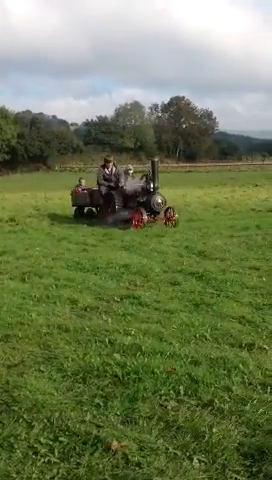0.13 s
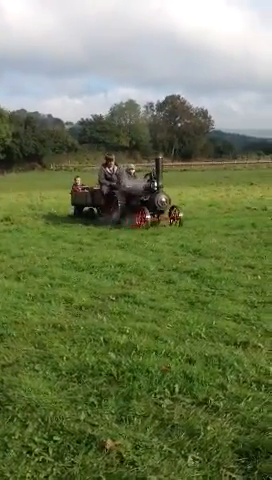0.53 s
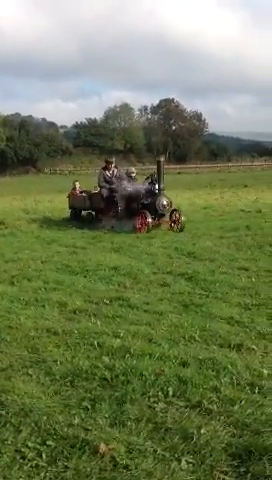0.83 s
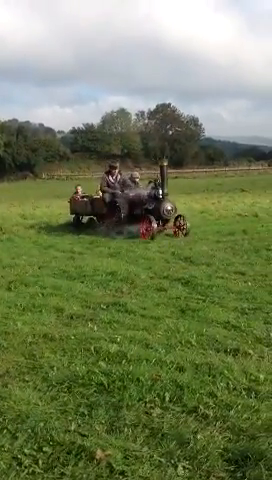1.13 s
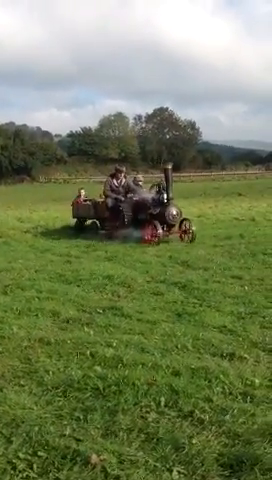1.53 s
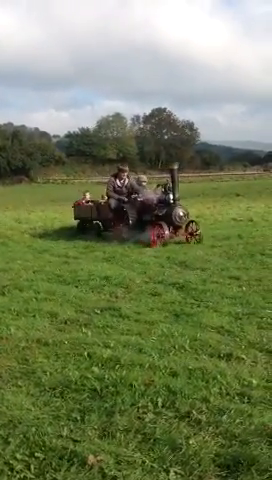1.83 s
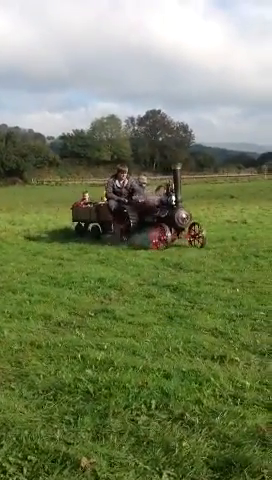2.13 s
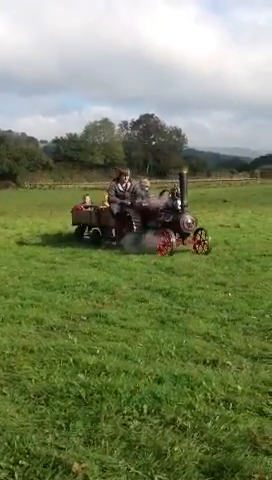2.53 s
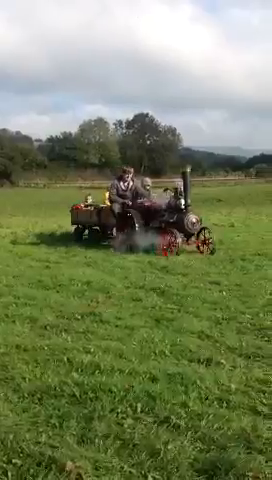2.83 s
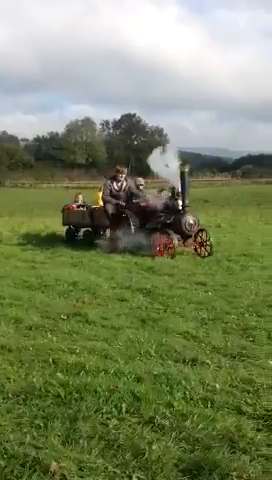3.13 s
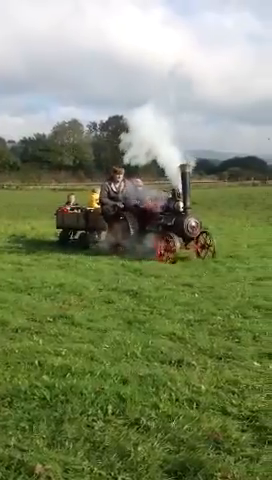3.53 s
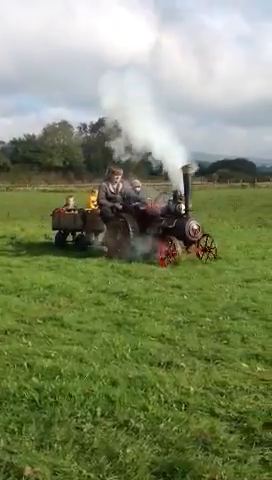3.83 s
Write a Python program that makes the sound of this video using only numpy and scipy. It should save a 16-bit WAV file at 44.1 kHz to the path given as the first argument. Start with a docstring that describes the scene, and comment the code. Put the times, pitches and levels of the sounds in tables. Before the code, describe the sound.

Brisk, even exhaust chuffs from a miniature steam engine, ending in a loud overblown steam whistle

```python
"""A miniature steam traction engine crosses a field: wheels rumble, ironwork rings and steam leaks, all shaped noise.
Over this the exhaust barks up the chimney about seven times a second, each beat a blast, an exhale and a low push.
The whistle gives a thin high chirp, a gliding sine; later it sounds low, as a stack of partials.
Then it rises and overblows in a loud hiss as its valve opens, and the recorder's gain control ducks the mix."""
import sys
import numpy as np
from scipy import signal
from scipy.fft import rfft, irfft, next_fast_len
from scipy.io import wavfile
from scipy.ndimage import uniform_filter1d, map_coordinates

SR = 44100
rng = np.random.default_rng(int(sys.argv[2]) if len(sys.argv) > 2 else 0)


def materialize(psi):
    """Save the field psi as 16-bit PCM at rate SR to the path in sys.argv[1].

    A 1-D psi becomes a single channel; in a 2-D psi each row is a channel.
    """
    bounded = np.clip(np.atleast_2d(psi).T, -1, 1)
    quanta = np.round(bounded * 32767).astype(np.int16)
    wavfile.write(sys.argv[1], SR, quanta)


N = 176400  # samples, four seconds

# All levels are set ahead of the gain control; colours are relative, their noise is scaled to rms 1.
# Colour of gears and wheels: (frequency [Hz], density [dB per Hz])
RUMBLE_COLOUR = [(30, -45), (60, -25), (100, -20.5), (150, -2), (220, -6.5), (320, -3.5), (410, -7.5),
                 (520, -11), (700, -30), (1200, -80)]
# Ringing gearing and ironwork: (frequency [Hz], width [Hz], level [dB])
IRON_RINGS = [(232.2, 7.1, -41.5), (308, 12, -48), (456, 37, -54.5), (928, 74, -48.5), (1410, 210, -48),
              (2410, 110, -46)]
# Colour of the steam leak: (frequency [Hz], density [dB per Hz])
LEAK_COLOUR = [(100, -24), (450, -1.5), (700, 0), (2000, 0), (5000, -2), (9000, -7), (15000, -16.5)]
# Exhaust beats: (time [s], level [dB], attack [s], treble tilt [dB per octave],
# exhale against the blast [dB], rasp in the upper mids [dB])
EXHAUST_BEATS = [(0.052, -17.5, 0.008, 0.7, -2.5, 8), (0.216, -15.5, 0.011, 0, -4.5, 0),
                 (.359, -18, 0.0076, 0, -3, 3.5), (.516, -20.5, 0.013, 1, -1, 1.5),
                 (0.655, -16.5, 0.0095, -0.9, -2, 3.5), (0.812, -16.5, 0.0083, -0.5, -5, 1),
                 (0.956, -16, 0.012, 0.2, -1.5, 2.5), (1.112, -15.5, .011, -0.5, -3, -0.5),
                 (1.253, -17, 0.0076, 0, 0, -1), (1.410, -15.5, 0.013, 0.3, -4, 0.5),
                 (1.546, -15, 0.0087, -0.4, -2.5, -1), (1.701, -17.5, .012, 0.5, -2, 2.5),
                 (1.839, -16.5, 0.0075, 0.5, -0.5, 2), (1.988, -15.5, 0.012, -0.5, -3, 2.5),
                 (2.129, -14.5, 0.0094, .5, -3, -0.5), (2.292, -15.5, 0.0093, -0.1, -4.5, 0.5),
                 (2.432, -16, 0.0089, -0.3, -0.5, 1), (2.584, -13.5, 0.016, -0.5, -4.5, 0),
                 (2.722, -14.5, 0.0072, 0, -0.5, -0.5), (2.872, -14, 0.013, -0.5, -2.5, 1),
                 (3.002, -15, .007, 0.04, -1.5, -4), (3.149, -16, 0.0091, 0, -3.5, 2),
                 (3.285, -18, 0.0087, 0, -1.5, -3.5), (3.439, -19, 0.0071, -2.5, -4, -2),
                 (3.567, -19, 0.0082, -2, -1.5, 2), (3.707, -18, 0.0088, -4, -5, 1),
                 (3.843, -16, 0.0071, 0, -6.5, 0), (3.984, -16.5, 0.0084, -1, -3, -2)]
# Colour of the blast ahead of the chimney: (frequency [Hz], density [dB per Hz])
BLAST_COLOUR = [(60, -39), (130, -4), (250, 0.5), (450, -23), (700, -8), (1500, -7), (1900, 1), (2700, -2),
                (3300, 0), (3800, -2), (4400, -1), (7000, -4.5), (10000, -8), (15000, -12.5)]
# Colour of the exhale ahead of the chimney: (frequency [Hz], density [dB per Hz])
EXHALE_COLOUR = [(60, -37), (200, -5), (450, -5), (900, -1), (1500, -1.5), (2000, 0), (3500, -3.5),
                 (5000, -1.5), (9000, -8), (15000, -14)]
# Chimney resonances and the notches between them: (frequency [Hz], width [Hz], boost [dB])
CHIMNEY_MODES = [(600, 57, 12.5), (861, 83, 13.5), (973, 93, 10.5), (1238, 51, 10), (1660, 72, -2.5),
                 (1817, 70, 5), (1990, 150, 3), (2520, 84, 2), (2620, 80, -4), (2950, 80, -3),
                 (3120, 370, 3.5), (3510, 82, -5), (3950, 120, -5.5), (4310, 400, 0.5)]
# Push of air from the chimney: (frequency [Hz], 60 dB decay [s], level against the blast [dB])
THUMP_MODES = [(78, 0.13, -19), (136.7, 0.058, -15)]
# The barely opened whistle in its upper mode: (time [s], pitch [Hz], level [dB])
CHIRP_CURVE = [(1.632, 4900, -49), (1.657, 4915, -23.5), (1.685, 4898, -23.5), (1.705, 4870, -31),
               (1.745, 4910, -37), (1.768, 4878, -25), (1.8, 4860, -34), (1.815, 4875, -58),
               (1.835, 4890, -35), (1.86, 4890, -55)]
# Whistle fundamental, centre of its jitter: (time [s], pitch [Hz])
WHISTLE_PITCH = [(2.908, 1344), (2.932, 1425), (2.96, 1438), (3.06, 1436), (3.14, 1450), (3.2, 1540),
                 (3.25, 1608), (3.32, 1631), (3.41, 1648), (3.65, 1654), (3.77, 1674), (3.845, 1679),
                 (3.9, 1661), (4, 1674)]
# First partial of the whistle: (time [s], level [dB])
FIRST_LEVEL = [(2.895, -70), (2.915, -25), (2.94, -18.5), (3.0, -19), (3.04, -24), (3.14, -18), (3.18, -25),
               (3.2, -17), (3.26, -14), (3.335, -10.5), (3.37, -23), (3.405, -11.5), (3.51, -12),
               (3.575, -24.5), (3.625, -13.5), (3.76, -9.5), (3.825, -22.5), (3.865, -13), (3.9, -18),
               (3.955, -13), (4, -18.5)]
# Second partial: (time [s], level [dB])
SECOND_LEVEL = [(3.15, -62), (3.3, -34), (3.4, -26), (3.58, -26.5), (3.72, -22.5), (3.84, -18),
                (3.9, -23.5), (4, -20)]
# Third partial, carrying the fourth and the breathy ring with it: (time [s], level [dB])
THIRD_LEVEL = [(3.18, -60), (3.225, -25.5), (3.26, -15.5), (3.35, -14.5), (3.6, -15), (3.74, -13.5),
               (3.85, -11.5), (4, -11)]
# Steam jet at the whistle's mouth: (time [s], level [dB])
JET_LEVEL = [(2.88, -70), (2.93, -38), (3.13, -37.5), (3.2, -26), (3.28, -20), (3.6, -17), (4, -14.5)]
# Colour of that jet: (frequency [Hz], density [dB per Hz])
JET_SPECTRUM = [(300, -15.5), (1000, -12.5), (1500, -2.5), (2000, -8), (2400, -3), (3100, -9.5),
                (3600, -0.5), (4250, -6.5), (4700, 4), (5300, 2.5), (6200, -1.5), (6650, -2), (7100, -0.5),
                (9000, -3), (12000, -1.5), (15000, -4.5)]

RUMBLE_DB, LEAK_DB = -38, -37.5
HOLD_S, FALL_DB_PER_S = 0.017, 640  # the blast as the port opens
TAIL_DB_PER_S, CLOSE_S, CLOSE_DB_PER_S = 110.5, 0.044, 156  # the cylinder empties, faster once the port narrows
TILT_PIVOT_HZ = 2000
RASP_HZ, RASP_WIDTH_HZ = 2530, 990
FOURTH_DB, SKIRT_DB = -21.5, -9  # against the third partial
SKIRT_HZ, SKIRT_WIDTH_HZ = 4810, 270  # breathy ring of the pipe just under that partial
BREAK_AT_S, BREAK_S, BREAK_DB = 3.23, .06, 2  # the tone sputters as it starts to overblow
AGC_DB, AGC_SLOPE, AGC_S = -18.5, 0.57, 0.31  # threshold, share of the excess removed, averaging time
LOW_CUT_HZ, TOP_HZ = 68, 15400


def amp(db):
    """Decibels to gain."""
    return 10 ** (np.asarray(db) / 20)


def unit(x):
    """Scale to rms 1."""
    return x / np.sqrt(np.mean(x ** 2) + 1e-20)


def along(points, hz):
    """Read (frequency [Hz], value) points on a log frequency axis."""
    f, value = np.transpose(points)
    return np.interp(np.log(hz + 1), np.log(f + 1), value)


def curves(rows):
    """One value per sample for each column after the time."""
    s, *columns = np.transpose(rows)
    return [np.interp(np.arange(N) / SR, s, column) for column in columns]


def level(rows):
    """Gain from a table whose last column is dB, silent before it starts."""
    started = np.arange(N) / SR > rows[0][0]
    return amp(curves(rows)[-1]) * started


def wobble(rate):
    """A smooth random curve, rate knots a second."""
    knots = rng.standard_normal(int(N * rate / SR) + 4)
    return map_coordinates(knots, [np.arange(N) * rate / SR])


def filtered(x, response):
    """Shape x by a gain that depends on frequency."""
    size = next_fast_len(N + SR // 2)
    hz = np.fft.rfftfreq(size, 1 / SR)
    return irfft(rfft(x, size) * response(hz), size)[:N]


def bell(hz, centre, width):
    """Resonance curve peaking at 1, down to half at half the width either side."""
    return 1 / (1 + (2 * (hz - centre) / width) ** 2)


def noise(colour_db):
    """Noise of rms 1 coloured by a dB function of frequency."""
    return unit(filtered(rng.standard_normal(N), lambda hz: amp(colour_db(hz))))


def band(centre, width):
    """Noise of rms 1 in one resonance."""
    return unit(filtered(rng.standard_normal(N), lambda hz: bell(hz, centre, width)))


def patchy(x, depth_db):
    """Turbulence: patches of random gain in time and frequency."""
    spectrum = signal.stft(x, nperseg=256)[2]
    field = rng.standard_normal(spectrum.shape)
    field = uniform_filter1d(field, size=4, axis=0)  # smooth over frequency
    field = uniform_filter1d(field, size=8, axis=1)  # smooth over time
    return unit(signal.istft(spectrum * amp(depth_db * unit(field)), nperseg=256)[1][:N])


def running_gear():
    """Rumbling wheels, ringing gears and the cylinder leak: shaped noises, the rumble and leak swaying a little."""
    bumps_db = .8 * wobble(30)
    rumble = amp(RUMBLE_DB + bumps_db) * noise(lambda hz: along(RUMBLE_COLOUR, hz))
    iron = sum(amp(db) * band(hz, width) for hz, width, db in IRON_RINGS)
    leak_db = LEAK_DB + 1.5 * wobble(12.96)
    leak = amp(leak_db) * noise(lambda hz: along(LEAK_COLOUR, hz))
    return rumble + iron + leak


def chimney_db(hz):
    """The chimney's resonances and notches, summed in dB."""
    return sum(db * bell(hz, centre, width) for centre, width, db in CHIMNEY_MODES)


def exhaust(turbulence_db=2.5, sputter_db=1.0):
    """Each beat is a turbulent blast and softer exhale coloured by the chimney, with a low push of decaying sines."""
    out = np.zeros(N + SR)
    t = np.arange(SR // 3) / SR
    blast = patchy(noise(lambda hz: along(BLAST_COLOUR, hz) + chimney_db(hz)), depth_db=turbulence_db)
    blast = blast * amp(sputter_db * wobble(300))
    exhale = patchy(noise(lambda hz: along(EXHALE_COLOUR, hz) + chimney_db(hz)), depth_db=2.0)
    exhale = exhale * amp(0.41 * wobble(90))
    blast_shape = amp(-FALL_DB_PER_S * np.maximum(t - HOLD_S, 0))
    exhale_shape = amp(-TAIL_DB_PER_S * t - CLOSE_DB_PER_S * np.maximum(t - CLOSE_S, 0))
    thump = sum(amp(db - 60 * t / t60) * np.sin(2 * np.pi * hz * t) for hz, t60, db in THUMP_MODES)
    f = np.fft.rfftfreq(len(t), 1 / SR)
    octaves = np.log2(np.maximum(f / TILT_PIVOT_HZ, 1 / 4))  # the tilt levels off two octaves down
    for s, db, attack, tilt_db, exhale_db, rasp_db in EXHAUST_BEATS:
        at = round(s * SR) + np.arange(len(t))
        steam = blast[at % N] * blast_shape
        steam = steam + amp(exhale_db) * exhale[at % N] * exhale_shape
        tone_db = tilt_db * octaves + rasp_db * bell(f, RASP_HZ, RASP_WIDTH_HZ)
        steam = irfft(rfft(steam) * amp(tone_db), len(t))
        gate = np.clip(np.minimum(t, t[-1] - t) / attack, 0, 1)  # fades in and out
        out[at] += amp(db) * gate * (steam + thump)
    return out[:N]


def chirp():
    """A wisp of steam sounds only the whistle's upper mode, a gliding sine."""
    hz, _ = curves(CHIRP_CURVE)
    tone = np.sqrt(2) * np.sin(2 * np.pi * np.cumsum(hz) / SR)
    before_end = np.arange(N) / SR < CHIRP_CURVE[-1][0]
    return level(CHIRP_CURVE) * tone * before_end


def whistle(jitter=.0012, flutter_db=1.0, low_flutter_db=0.75):
    """More steam raises the pitch, overblows the pipe to its third partial and swells the hiss."""
    hz, = curves(WHISTLE_PITCH)
    phase = 2 * np.pi * np.cumsum(hz * (1 + jitter * wobble(250))) / SR

    def tone(order, rough_db):
        """One partial of rms about 1, its level fluttering."""
        return np.sqrt(2) * np.sin(order * phase) * amp(rough_db * wobble(220))

    break_db = BREAK_DB * np.exp(-((np.arange(N) / SR - BREAK_AT_S) / BREAK_S) ** 2)
    first = tone(order=1, rough_db=low_flutter_db + break_db)
    second = tone(order=2, rough_db=flutter_db)
    third = tone(order=3, rough_db=flutter_db)
    fourth = amp(FOURTH_DB) * tone(order=4, rough_db=flutter_db)
    skirt = amp(SKIRT_DB) * band(SKIRT_HZ, SKIRT_WIDTH_HZ)
    overblown = third + fourth + skirt
    jet = patchy(noise(lambda f: along(JET_SPECTRUM, f)), depth_db=1.4)
    low = level(FIRST_LEVEL) * first + level(SECOND_LEVEL) * second
    return low + level(THIRD_LEVEL) * overblown + level(JET_LEVEL) * jet


def scene():
    """Running gear, exhaust and whistle together, the same in both ears."""
    engine = running_gear() + exhaust()
    return np.tile(engine + chirp() + whistle(), (2, 1))


def record(dry):
    """Slow gain control on the averaged power, then the microphone's low cut and the band limit."""
    keep = np.exp(-1 / (AGC_S * SR))
    power = signal.lfilter([1 - keep], [1, -keep], dry[0] ** 2)
    heard_db = 10 * np.log10(power + 1e-12)
    gain = amp(-AGC_SLOPE * np.maximum(heard_db - AGC_DB, 0))
    low_cut = signal.butter(4, LOW_CUT_HZ, "high", fs=SR, output="sos")
    return np.array([filtered(signal.sosfilt(low_cut, x * gain), lambda hz: hz < TOP_HZ) for x in dry])


dry = scene()
out = record(dry)
materialize(out)
```